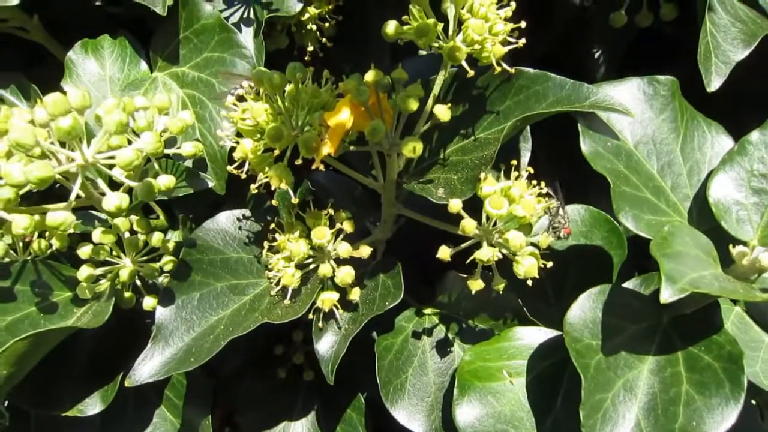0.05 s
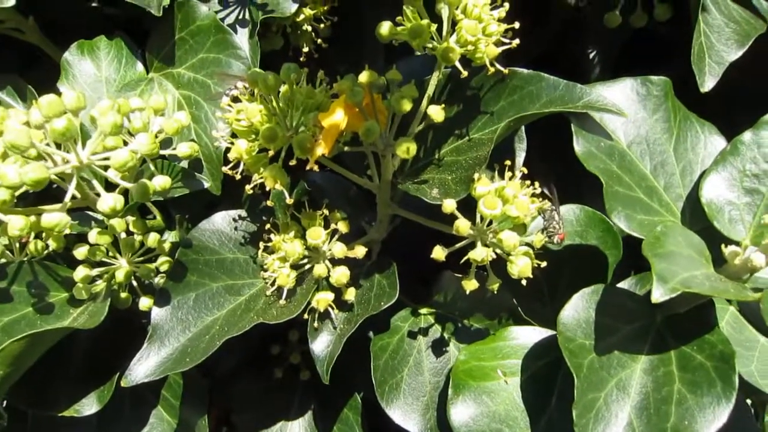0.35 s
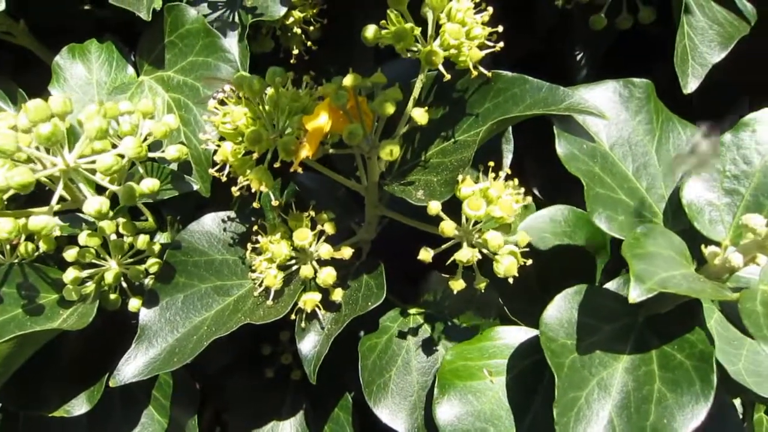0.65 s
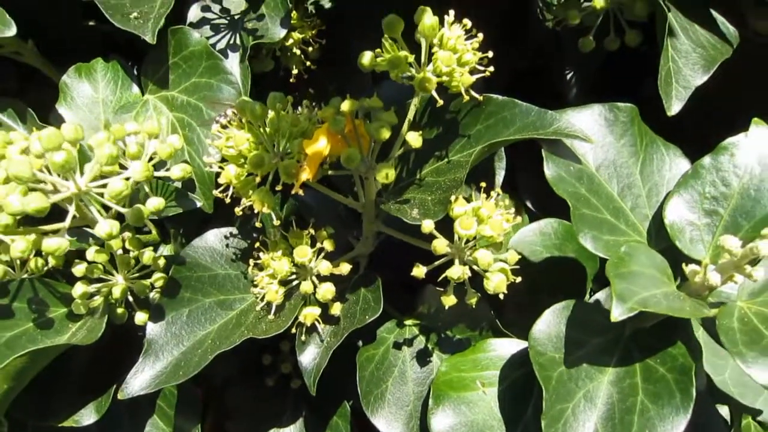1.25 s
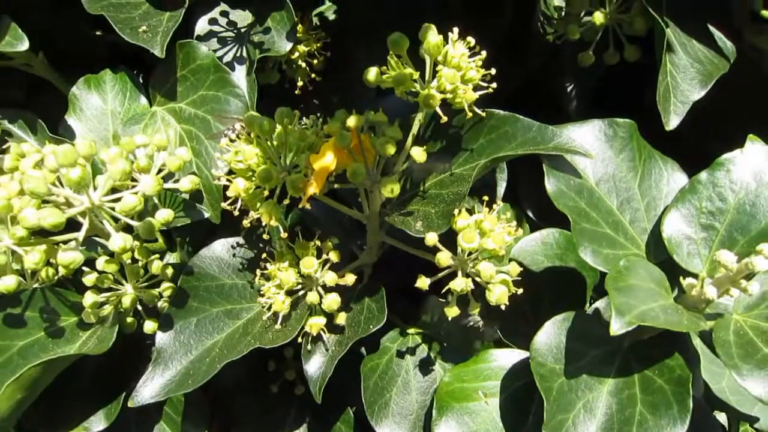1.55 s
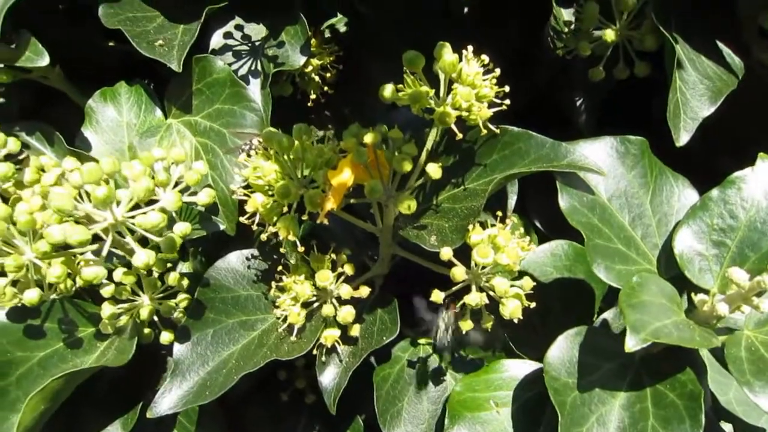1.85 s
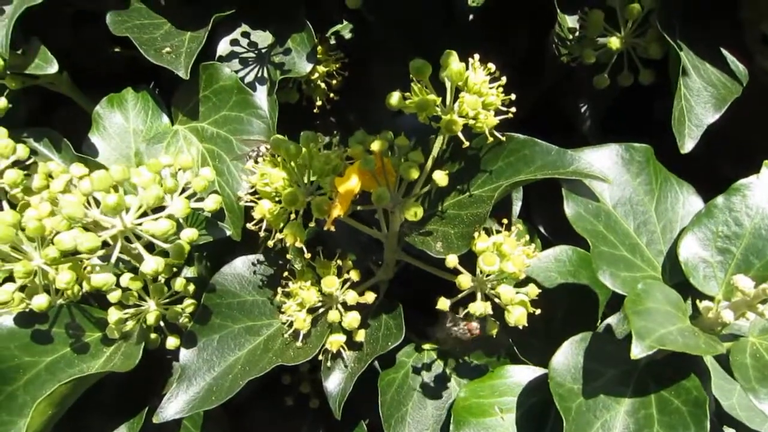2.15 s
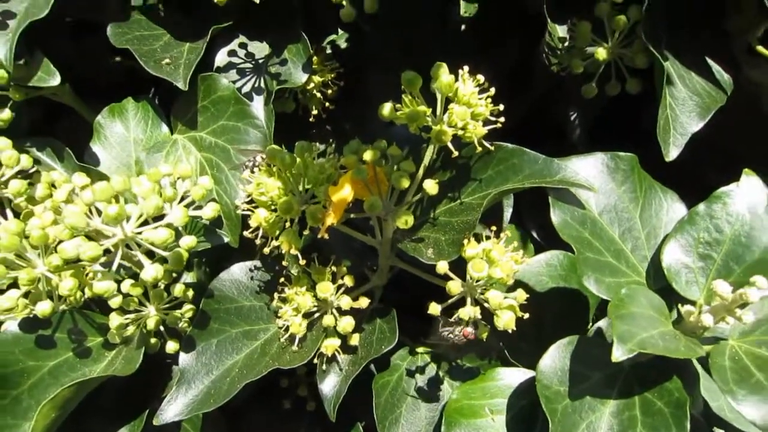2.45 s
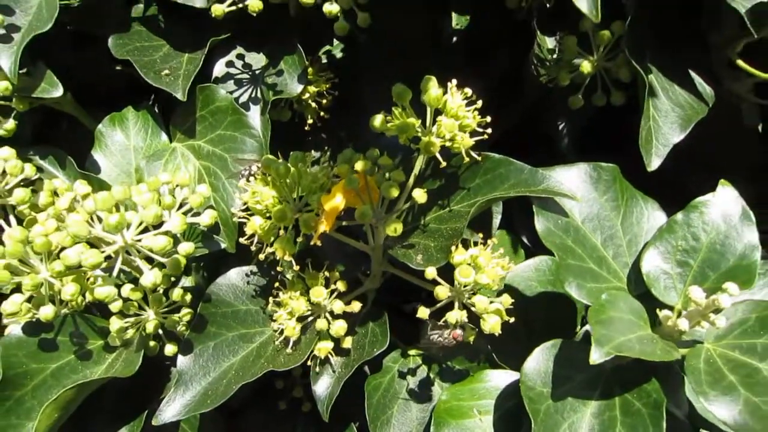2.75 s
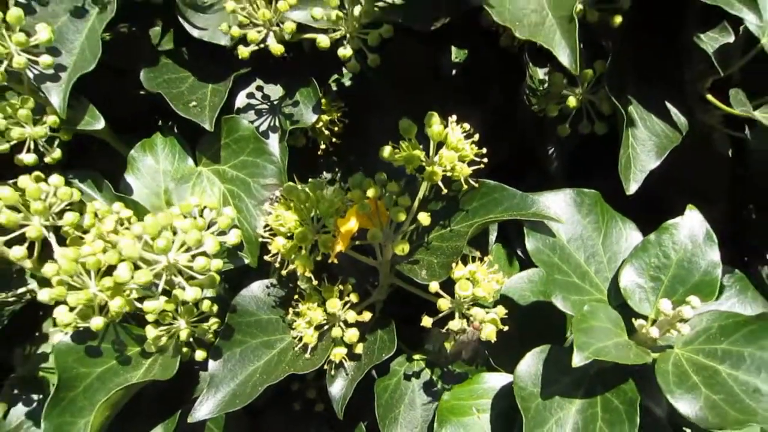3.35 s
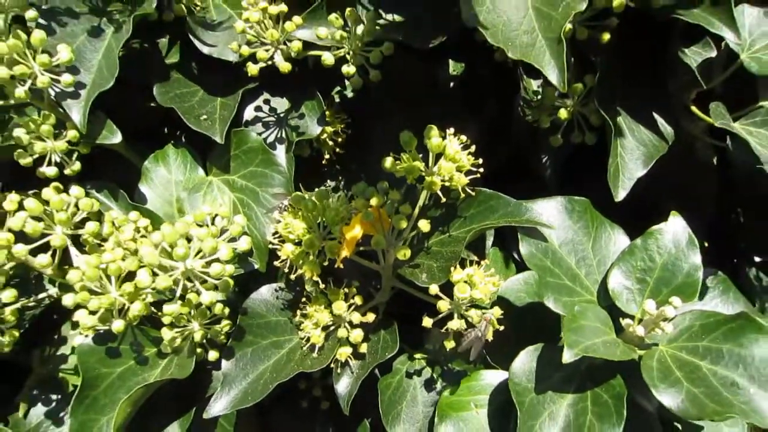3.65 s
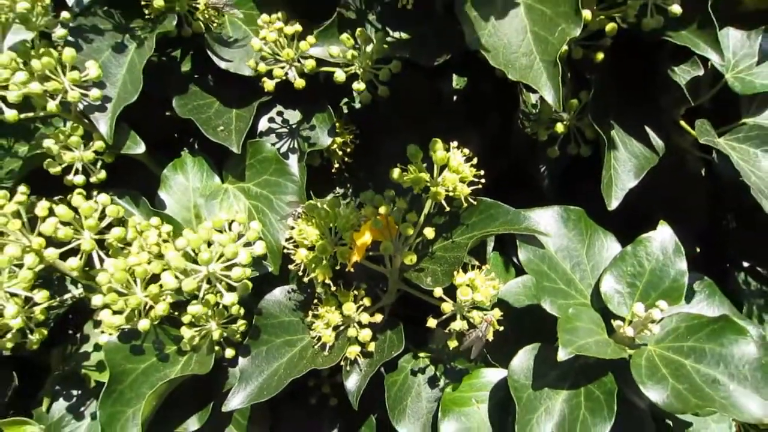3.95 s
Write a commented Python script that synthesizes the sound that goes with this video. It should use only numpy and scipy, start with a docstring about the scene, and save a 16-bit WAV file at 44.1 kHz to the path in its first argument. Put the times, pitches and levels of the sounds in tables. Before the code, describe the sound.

A bee buzzes past close by, over a distant engine drone and rustling leaves.

```python
"""A garden with flowering ivy. A bee darts close past the microphone, its wingbeats buzzing,
and others hum among the flowers. A far engine drones, its overtones fading in and out on the air.
Leaves rustle and stems tick softly as they slip, over a low outdoor wash."""
import sys
import numpy as np
from scipy import signal
from scipy.io import wavfile
from scipy.ndimage import uniform_filter1d

SR = 44100
rng = np.random.default_rng(int(sys.argv[2]) if len(sys.argv) > 2 else 0)


def master(y):
    """Save y as 16-bit WAV."""
    cut = np.clip(np.atleast_2d(y).T, -1, 1)
    pcm = np.round(cut * 32767)  # scale
    wavfile.write(sys.argv[1], SR, pcm.astype(np.int16))


N = 176400
T = np.arange(N) / SR
BEE_PAN_DB = -4
LEAF_LIKENESS = 0.33
# left-right correlation of air noise: freq_hz, likeness
AIR_LIKENESS = [(30, 0), (80, 0.89), (170, 1), (400, 0.99), (800, 0.27), (2500, 0), (8000, 0)]


def from_db(db):
    """Decibels to gain."""
    return 10 ** (np.asarray(db) / 20)


def unit_rms(x):
    """Scale to unit power."""
    return x / np.sqrt(np.mean(x ** 2) + 1e-20)


def in_time(rows):
    """Value columns of a time table at every sample."""
    time_s, *columns = np.transpose(rows)
    return [np.interp(T, time_s, column) for column in columns]


def envelope(rows):
    """Gain per sample from rows of time_s, level_db."""
    return from_db(in_time(rows)[0])


def at_hz(points, hz):
    """Read a spectrum on a log-frequency axis."""
    freq_hz, values = np.transpose(points)
    return np.interp(np.log(hz), np.log(freq_hz), values)


def pan(db):
    """Channel gains for a left-minus-right level."""
    return from_db(np.array([[1], [-1]]) * db / 2)


def drift(rate_hz):
    """Smooth random wander, unit RMS."""
    hop, settle = 100, 2000
    pole = np.exp(-2 * np.pi * rate_hz * hop / SR)
    noise = rng.standard_normal(N // hop + settle + 2)
    slow = signal.lfilter([1], [1, -2 * pole, pole * pole], noise)[settle:]
    return np.interp(np.arange(N) / hop, np.arange(len(slow)), unit_rms(slow))


def stereo(mid, side, likeness):
    """Two channels with a given correlation."""
    return np.sqrt(1 + likeness) * mid + np.sqrt(1 - likeness) * side * np.array([[1], [-1]])


def bandpass(x, order, low_hz, high_hz):
    """Butterworth band-pass."""
    return signal.sosfilt(signal.butter(order, [low_hz, high_hz], "band", fs=SR, output="sos"), x)


def coloured(sources, spectrum, likeness, flicker_db):
    """Half-octave bands from two mid/side sources in turn, each flickering on its own; unit RMS."""
    edges_hz = 15900 * 2 ** (np.arange(-19, 1) / 2)
    out = 0
    for k, (low_hz, high_hz) in enumerate(zip(edges_hz, edges_hz[1:])):
        hz = np.sqrt(low_hz * high_hz)
        if spectrum[0][0] <= hz <= spectrum[-1][0]:
            mid, side = bandpass(sources[k % 2], 3, low_hz, high_hz)
            gain = from_db(at_hz(spectrum, hz) + flicker_db * drift(19))
            out += gain * stereo(mid, side, at_hz(likeness, hz))
    return unit_rms(out)


def partial(phase, width, drift_hz):
    """One tone with scattered reflections that differ between the ears."""
    scatter = width * (.5 * drift(drift_hz) * np.cos(phase) + 1.3 * drift(drift_hz) * np.sin(phase))
    return np.sqrt(2) * np.cos(phase) + scatter * np.array([[1], [-1]])


def flight(path, churn):
    """Unsteady wingbeats of a near bee and the air they chop, swelling as it comes closer."""
    # upper wingbeat harmonics: freq_hz, gain_db
    wing_spectrum = [(590, -2.5), (640, 0), (685, 5.5), (820, 2), (910, -2.5), (1090, 0), (1280, -5.5),
                     (1500, -7.5), (1900, -15.5), (2600, -28)]
    jitter, flutter_db = .0135, 2.5
    dispersion_rad = .7  # spreads each stroke over its cycle
    wingbeat_hz, first_db, second_db, upper_db = in_time(path)
    phase = 2 * np.pi * np.cumsum(wingbeat_hz * (1 + jitter * drift(39.5))) / SR
    levels_db = [first_db, second_db]
    for k in range(3, 11):
        levels_db.append(upper_db + at_hz(wing_spectrum, k * wingbeat_hz) + flutter_db * drift(32))
    buzz = sum(from_db(db) * partial(k * phase + dispersion_rad * k * k, width=.7, drift_hz=1.6)
               for k, db in enumerate(levels_db, 1))
    chopped_air = from_db(upper_db - 2) * churn * (1 + .42 * np.cos(phase))
    gate = uniform_filter1d(1. * ((T > path[0][0]) & (T < path[-1][0])), size=1000)
    return pan(BEE_PAN_DB) * gate * (buzz + chopped_air)


def near_bee():
    """Close flights, and one soft puff of wake on the microphone."""
    # one table per flight, turns shift the balance: time_s, wingbeat_hz, first_db, second_db, upper_db
    paths = [
        [(.3, 226.2, -52, -50, -59), (.39, 217.8, -43, -49, -57.5), (.445, 212.4, -45, -35.5, -51.5),
         (.49, 215, -41, -37.5, -46), (.525, 206.7, -37, -38, -45.5), (.565, 195.6, -36, -43.5, -48),
         (.62, 201.5, -34.5, -39, -50.5), (.67, 196.4, -37, -40, -52), (.72, 188.1, -46, -44, -63.5),
         (.78, 181.3, -45, -41.5, -59), (.88, 179.9, -51, -46, -59), (.97, 177.3, -60, -47, -70)],
        [(1.04, 190.2, -54, -57, -59), (1.1, 196.4, -42, -43, -55), (1.15, 203.8, -58, -50, -60),
         (1.2, 215.5, -47.5, -42, -53), (1.28, 223.9, -57, -62, -66)],
        [(1.31, 225.2, -56, -54, -78), (1.34, 226, -42.5, -39.5, -54), (1.365, 226, -35, -38.5, -47),
         (1.39, 229.4, -47, -50, -58), (1.425, 234.3, -44, -55, -60), (1.49, 231, -58, -58, -70)],
        [(2.2, 192, -60, -52, -66), (2.27, 196.6, -57, -42, -65), (2.34, 199.8, -61, -40.5, -72),
         (2.43, 202.4, -60, -54, -73)],
        [(3.66, 200, -61, -68, -71), (3.77, 195.9, -51, -54, -68), (3.95, 194.3, -52.5, -53, -68)],
    ]
    # air churned by the wings: freq_hz, density_db
    churn_spectrum = [(280, -3), (450, -27), (800, 4), (1200, 5.5), (1700, 0), (2500, -8)]
    puff_s, puff_half_width_s, puff_db = .62, .022, -43
    churn = coloured(rng.standard_normal((2, 2, N)), churn_spectrum, AIR_LIKENESS, flicker_db=3.5)
    rumble = unit_rms(bandpass(rng.standard_normal((2, N)), 2, low_hz=15, high_hz=55))
    puff = from_db(puff_db) * np.exp(-((T - puff_s) / puff_half_width_s) ** 2) * rumble
    return sum(flight(path, churn) for path in paths) + puff


def engine():
    """Firing pulses as a stack of orders, smeared by the exhaust pipe and fading slowly on their way."""
    # firing rate: time_s, rate_hz
    firing = [(0, 79.44), (.5, 79.97), (1.5, 79.46), (2.0, 79.2), (2.5, 79.58), (4, 79.16)]
    # levels of orders 1, 2, 4 and of the overtone stack: time_s, level_db
    first = [(0, -44), (.8, -46), (1.1, -42.5), (1.65, -46.5), (1.85, -51), (2.1, -51.5), (2.4, -42.5),
             (2.9, -45), (4, -47)]
    second = [(0, -37), (.3, -38.5), (.75, -45.5), (1.15, -48), (1.5, -46), (1.8, -49.5), (2.3, -50),
              (2.68, -43), (2.9, -49), (3.1, -46.5), (3.3, -52), (4, -53)]
    fourth = [(0, -34), (.28, -35), (.55, -47), (1.05, -50), (1.3, -43), (1.65, -50), (1.85, -42.5),
              (2.12, -39), (2.3, -50), (2.5, -42), (2.75, -46.5), (3.3, -51), (4, -48)]
    stack_level = [(0, -33), (.25, -35.5), (0.602, -46.5), (1.62, -47.5), (1.85, -40.5), (2.12, -40),
                   (2.45, -41.5), (2.8, -45), (3.2, -44.5), (4, -44)]
    # overtone stack, fractions from uneven firing: firing_multiple, gain_db
    overtones = [(1.5, -23.5), (2.25, -14.5), (2.5, -26), (3.25, -13.5), (3.5, -15.5), (4.25, -14),
                 (4.5, -22.5), (4.75, -19.5), (5, -8), (5.25, -24), (5.5, -18.5), (6, -10), (7, -22),
                 (8, -26), (9, -21.5), (10, -24.5), (11, -31), (12, -27), (13, -26)]
    third_db, fade_db, dispersion_rad, jitter = -48.5, 1.6, .4, .0033
    phase = 2 * np.pi * np.cumsum(in_time(firing)[0] * (1 + jitter * drift(12.8))) / SR

    def order(k):
        return partial(k * phase + dispersion_rad * k * k, width=.47 * min(k / 2, 1) ** 2, drift_hz=1)

    stack = sum(from_db(db + fade_db * drift(1.6)) * order(k) for k, db in overtones)
    drone = envelope(first) * order(1) + envelope(second) * order(2)
    drone += from_db(third_db) * order(3) + envelope(fourth) * order(4)
    return pan(db=-2.5) * (drone + envelope(stack_level) * stack)


def leaves():
    """Each brush of leaves is a swell of dense, tiny slips."""
    # leaves brushing: peak_s, rise_s, fall_s, level_db
    brushes = [(.05, 0.23, 0.6, -54.5), (.36, 0.043, 0.029, -39.5), (0.414, 0.02, 0.056, -43),
               (.47, 0.058, 0.045, -40.5), (.523, 0.053, 0.032, -38.5), (.685, 0.072, 0.044, -43),
               (.85, 0.23, 0.11, -55), (1.028, 0.0065, 0.0054, -53), (1.115, 0.058, 0.016, -47),
               (1.2, 0.067, 0.063, -50.5), (1.51, 0.029, 0.021, -50.5), (1.872, 0.048, 0.075, -47.5),
               (2.95, 0.29, 0.2, -62), (3.58, 0.046, 0.011, -58), (3.838, 0.027, .03, -58.5),
               (3.97, 0.0098, .04, -54.5)]
    # rustle: freq_hz, density_db
    spectrum = [(500, 14.5), (1500, 3.5), (2600, -12), (4200, -0.5), (5400, -5), (7000, -1), (9500, -2),
                (12000, -4.5), (14500, -4.5), (16000, -6)]
    slips_per_s, spread_db = 3600, 3
    power = sum(from_db(2 * db) * np.exp(-((T - peak_s) / np.where(T < peak_s, rise_s, fall_s)) ** 2)
                for peak_s, rise_s, fall_s, db in brushes)
    onsets = rng.random(N) < slips_per_s / SR
    strength = from_db(spread_db * np.minimum(rng.exponential(1, N), 4))
    slips = onsets * strength * rng.standard_normal((2, 2, N))
    return np.sqrt(power) * coloured(slips + 1e-18, spectrum, [(1000, LEAF_LIKENESS)], flicker_db=1.2)


def stems():
    """A stem slips: a short crackle round one broad resonance."""
    # stem ticks: start_s, level_db, centre_hz, bandwidth_ratio
    ticks = [(.337, -40, 8000, .6), (0.365, -35, 9000, 0.75), (.408, -33, 10000, 0.51),
             (0.415, -33.5, 11000, .6), (0.71, -40.5, 6000, 0.95), (1.019, -44.5, 10100, .5),
             (1.033, -46, 12000, .5), (1.065, -46.5, 4180, .3), (1.12, -45, 9000, .6),
             (1.519, -41, 8550, .8), (1.557, -45.5, 4550, 0.32), (1.731, -49, 4000, 0.44),
             (1.864, -42, 8060, .5), (1.898, -43, 8300, .6), (3.078, -48.5, 7470, 0.14),
             (3.585, -50, 10000, 0.46), (3.888, -53, 6340, .25), (3.959, -49, 9000, 0.91)]
    decay_s = .0056
    out = 0
    for start_s, level_db, centre_hz, bandwidth_ratio in ticks:
        radius = np.exp(-np.pi * bandwidth_ratio * centre_hz / SR)
        resonator = [1, -2 * radius * np.cos(2 * np.pi * centre_hz / SR), radius * radius]
        mid, side = signal.lfilter([1, 0, -1], resonator, rng.standard_normal((2, N)))
        decay = (T >= start_s) * np.exp(-abs(T - start_s) / decay_s)
        out += from_db(level_db) * decay * unit_rms(stereo(mid, side, LEAF_LIKENESS))
    return out


def far_bees(count=4):
    """Farther bees wander in pitch, place and loudness, duller with distance."""
    # hum per bee: time_s, level_db
    level = [(0, -49.5), (1.5, -55), (1.95, -53), (2.3, -53.5), (2.6, -53), (3.3, -57.5), (4, -58.5)]
    # wingbeat harmonics: freq_hz, gain_db
    spectrum = [(200, -10), (400, -0.5), (600, -10.5), (1000, -19.5), (1700, -27.5)]
    centre_hz, spread, wander, jitter = 202.7, .11, .04, .021
    out = 0
    for wingbeat_hz in centre_hz * (1 + spread * np.linspace(-1, 1, count)):
        pitch_hz = wingbeat_hz * (1 + wander * drift(1.5) + jitter * drift(30.6))
        phase = 2 * np.pi * np.cumsum(pitch_hz) / SR
        buzz = sum(from_db(at_hz(spectrum, k * wingbeat_hz)) * np.cos(k * phase) for k in range(1, 9))
        out += pan(BEE_PAN_DB + 6 * drift(.96)) * from_db(2.85 * drift(.96)) * unit_rms(buzz)
    return envelope(level) * out


def air():
    """Low outdoor wash and the faint hiss of distant foliage."""
    # noise spectra: freq_hz, density_db
    wash_spectrum = [(25, -6), (46, -9.5), (70, 2), (100, 0.5), (135, 1), (190, 0.5), (290, 1.5), (420, 4),
                     (590, -6), (850, -5.5), (1200, -10), (1700, -18), (2400, -54)]
    hiss_spectrum = [(2000, -8.5), (2900, -3), (4100, -2.5), (5500, -6), (8000, -1), (10000, -3.5),
                     (14000, -6.5)]
    # noise levels: time_s, level_db
    wash_level = [(0, -41), (.6, -40), (1.0, -42.5), (1.6, -41.5), (2.0, -44.5), (2.6, -41.5), (3.3, -43),
                  (4, -43)]
    hiss_level = [(0, -55.5), (.94, -53.5), (1.0, -57.5), (1.08, -55), (1.6, -55.5), (2.1, -57),
                  (2.5, -56.5), (3.0, -56.5), (3.2, -58), (3.55, -58.5), (3.68, -60.5), (3.85, -58.5),
                  (4, -60)]
    wash = coloured(rng.standard_normal((2, 2, N)), wash_spectrum, AIR_LIKENESS, flicker_db=1.76)
    hiss = coloured(rng.standard_normal((2, 2, N)), hiss_spectrum, AIR_LIKENESS, flicker_db=.45)
    return pan(db=-1.2) * (envelope(wash_level) * wash + envelope(hiss_level) * hiss)


def scene():
    """Engine, bees, ivy and air together."""
    return engine() + near_bee() + far_bees() + pan(db=-2) * (leaves() + stems()) + air()


def record(dry):
    """Brief fade-in, high-treble notch, steep low-pass."""
    fade_s, notch_hz, notch_depth, cutoff_hz = .006, 11950, .92, 15700
    faded = dry * np.minimum(T / fade_s, 1)
    notched = signal.lfilter(*signal.iirnotch(notch_hz, Q=4, fs=SR), faded)
    blend = faded + notch_depth * (notched - faded)
    return signal.sosfilt(signal.ellip(12, .2, 90, cutoff_hz, fs=SR, output="sos"), blend)


dry = scene()
out = record(dry)
master(out)
```